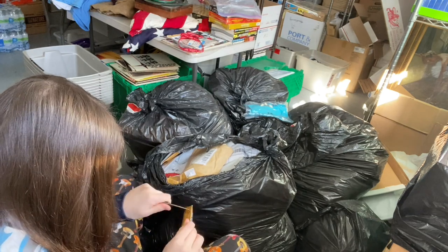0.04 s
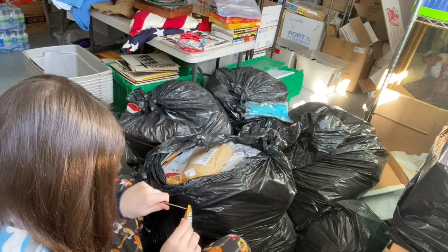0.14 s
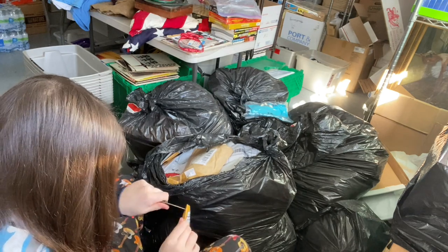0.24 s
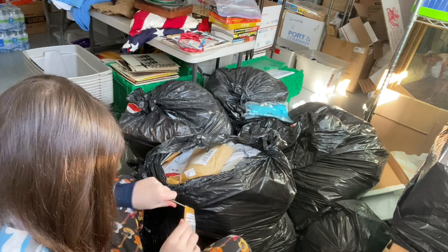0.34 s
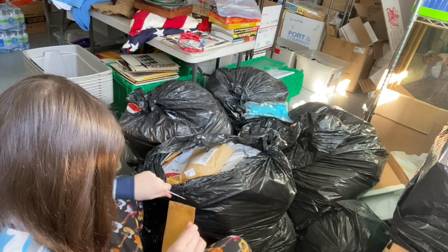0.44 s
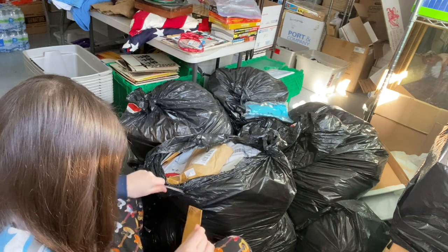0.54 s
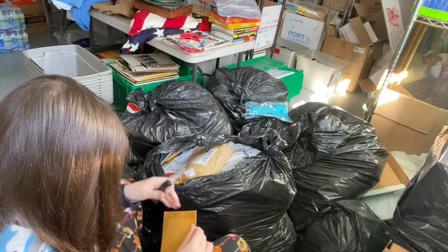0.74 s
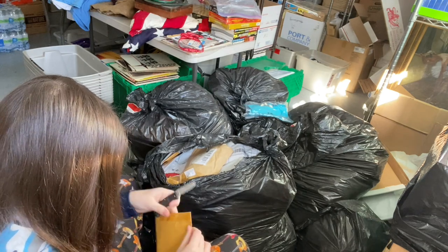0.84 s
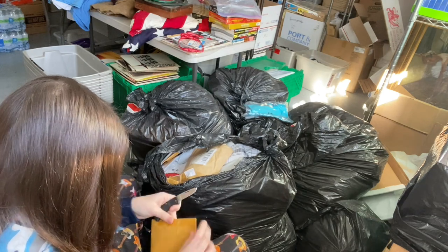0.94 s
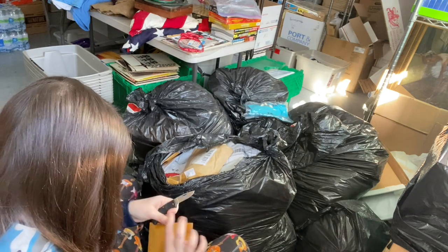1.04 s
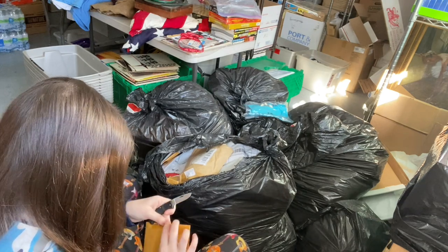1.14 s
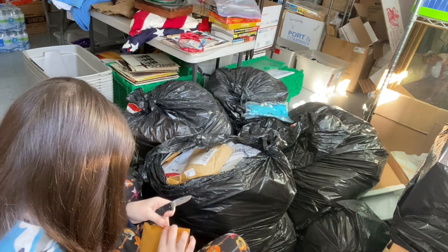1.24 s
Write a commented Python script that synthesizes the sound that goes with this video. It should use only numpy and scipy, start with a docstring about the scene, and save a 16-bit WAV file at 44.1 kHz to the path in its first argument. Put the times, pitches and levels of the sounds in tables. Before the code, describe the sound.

A small knife slits a paper envelope. After a soft thud and faint rustle, the blade pops sharply through the fold at about 0.2 seconds and rips along it in one quick, crackly stroke, ending near 0.35. From 0.75 to 1.3 seconds the envelope is turned, with quieter rustles, crease clicks and dull buckling pops. The room adds a short echo over a faint, low ventilation rumble.

```python
"""In a cluttered storeroom, a small knife pops through the fold of a paper envelope.
It rips along the fold in one quick stroke, snapping a stream of tiny fibres.
The envelope is then turned in the hands: it rustles, its creases tick and its faces buckle.
The room answers with a short, dense echo over a low ventilation rumble."""
import sys
import numpy as np
from scipy import signal
from scipy.fft import rfft, irfft
from scipy.io import wavfile

SR = 44100
rng = np.random.default_rng(int(sys.argv[2]) if len(sys.argv) > 2 else 0)


def generate_wav(signal):
    """Clip the signal to [-1, 1] and save it as 16-bit WAV at the path in sys.argv[1]."""
    frames = np.transpose(np.atleast_2d(signal))
    scaled = np.clip(frames, -1, 1) * 32767
    pcm = np.round(scaled).astype(np.int16)
    wavfile.write(sys.argv[1], SR, pcm)


N = 57330


def undb(db):
    """Turn decibels into a number to multiply by."""
    return 10 ** (np.asarray(db) / 20)


def clock():
    """The time of every sample, in seconds."""
    return np.arange(N) / SR


def unit(x):
    """Scale a sound to an average (rms) level of 1."""
    return x / np.sqrt(np.mean(x ** 2))


def fader(rows):
    """A volume curve through points of time_s, level_db."""
    return undb(np.interp(clock(), *np.array(rows).T))


def die_away(age, fade_s):
    """A volume curve that falls by 60 dB every fade_s seconds."""
    return np.exp(-np.log(1000) * age / fade_s)


def ring(x, response):
    """Make every sample of a sound set off the given response."""
    return signal.fftconvolve(x, response)[:N]


def colour(points, size=8192):
    """A short response of energy 1 whose tone follows points of pitch_hz, level_db."""
    hz, db = np.array(points).T
    grid_hz = np.maximum(np.arange(size // 2 + 1) * SR / size, 1)
    gains = undb(np.interp(np.log(grid_hz), np.log(hz), db))
    # keep the tone, but pack the energy as early as possible
    cepstrum = irfft(np.log(gains))
    cepstrum[1:size // 2] *= 2
    cepstrum[size // 2 + 1:] = 0
    response = irfft(np.exp(rfft(cepstrum)))
    return response / np.linalg.norm(response)


def burst(start_s, decay_s):
    """A puff of dying noise with energy 1."""
    age = clock() - start_s
    noise = rng.standard_normal(N) * (age >= 0) * np.exp(-np.abs(age) / decay_s)
    return noise / np.linalg.norm(noise)


def crackle(snaps_per_s, spread_db):
    """Tiny snaps at random times, mostly weak, a few strong."""
    sizes = undb(spread_db * np.minimum(rng.exponential(size=N), 4))
    happens = rng.random(N) < snaps_per_s / SR
    return unit(happens * sizes * rng.choice([-1, 1], N))


def room(x, direct_db=0, echo_db=0):
    """Left and right get the direct sound, then their own echo: nearby clutter and a tail that dulls."""
    delay_s, split_hz, room_db = 0.004, 6000, -1
    clutter_db, clutter_decay_s = 7, 0.0079
    age = np.maximum(clock()[:SR // 2] - delay_s, 0)
    noise = rng.standard_normal((2, len(age))) * (age > 0)
    low = signal.sosfilt(signal.butter(2, split_hz, fs=SR, output="sos"), noise)
    tail = low * die_away(age, fade_s=0.27) + (noise - low) * die_away(age, fade_s=0.25)
    tail *= 1 + undb(clutter_db) * np.exp(-age / clutter_decay_s)
    echo = np.array([ring(x, side / np.linalg.norm(side)) for side in tail])
    return undb(direct_db) * x + undb(room_db + echo_db) * echo


def ventilation():
    """Ventilation fills the room with rumble, faint hiss and a wavering low hum."""
    # tone of the rumble and hiss: pitch_hz, level_db
    air_tone = [(20, -17.5), (35, -11.5), (52, -3.5), (70, 1.5), (100, -12), (140, -18), (200, -26),
                (400, -36), (1000, -50), (3000, -53.5), (8000, -56.5), (16000, -60.5)]
    # how the hum swells and sinks: time_s, level_db
    hum_levels = [(0, -40.5), (.12, -63.5), (.2, -57.5), (.37, -44.5), (.47, -50.5), (.52, -45),
                  (.72, -61.5), (.83, -45.5), (1.03, -53.5), (1.12, -48), (1.2, -55.5), (1.27, -47.5)]
    air_db, hum_hz, stereo_width, right_louder_db = -56.5, 51, 0.48, 2
    middle, side = (unit(ring(rng.standard_normal(N), colour(air_tone))) for _ in range(2))
    hum = np.sqrt(2) * fader(hum_levels) * np.sin(2 * np.pi * (hum_hz * clock() + rng.random()))
    left_right = np.array([[1], [-1]])
    air = undb(air_db) * (middle + stereo_width * side * left_right)
    return (hum + air) * undb(-right_louder_db * left_right / 2)


def brushing():
    """Fingertips slide lightly over the paper with a thin hiss."""
    # touches of the skin: middle_s, level_db, half_length_s
    touches = [(0.754, -65.5, 0.017), (.985, -71, .03), (1.079, -57, .006), (1.275, -57, 0.049)]
    # tone of the hiss: pitch_hz, level_db
    hiss_tone = [(500, -35), (3000, -29), (6000, 0), (9000, -5), (13000, -5), (16000, -12.5)]
    contact = sum(undb(db) * np.exp(-.5 * ((clock() - at) / half_s) ** 2) for at, db, half_s in touches)
    hiss = ring(rng.standard_normal(N) * contact, colour(hiss_tone))
    return room(hiss, direct_db=-6.5)


def rustling(spots=3):
    """Fingers and blade catch and slip on the paper, making fine crackles at several spots."""
    # strength of the rubbing: time_s, level_db
    rub_levels = [(0, -53.5), (.035, -66.5), (.06, -54), (.095, -62), (.135, -76), (.18, -68), (.45, -80),
                  (.72, -102), (.745, -72.5), (.79, -63), (.808, -49.5), (.83, -67.5), (.86, -59.5),
                  (.915, -72.5), (.945, -56.5), (.99, -73.5), (1.055, -80), (1.08, -50.5), (1.12, -61.5),
                  (1.18, -73.5), (1.208, -53.5), (1.222, -50.5), (1.25, -48.5), (1.27, -56.5), (1.3, -47)]
    # tone of the rustle as heard, with a narrow band near 10.5 kHz cut away: pitch_hz, level_db
    heard_tone = [(100, -13.5), (250, -5), (500, 5.5), (1200, 7), (2300, 4.5), (3500, 0), (8000, -7),
                  (10500, -23), (13000, -9.5), (16000, -31.5)]
    rub, tone, out = fader(rub_levels), colour(heard_tone), 0
    for _ in range(spots):
        slips = crackle(snaps_per_s=2900, spread_db=4.5) * rub
        out += room(ring(slips, tone), direct_db=-5.5)
    return out / np.sqrt(spots)


def thud_and_ticks():
    """A soft low thud at the start, then sharp clicks as paper creases snap and briefly crumble."""
    # the thud, then the clicks: start_s, level_db, treble_tilt_db_per_octave, echo_db
    hits = [(0.015, -35, -18, -7), (0.1969, -39, -1.5, -4), (.2175, -14, 1, -4.5), (0.7987, -33, 0.5, 4),
            (0.9217, -32, 1, -0.5), (1.074, -24.5, 1.5, -0.5), (1.1615, -40, 0, -2), (1.1930, -38.5, 2, -1),
            (1.1978, -38.5, -2, -20), (1.2156, -27, 5.5, 7), (1.287, -25, 5, 0), (1.2935, -24.5, 4, 4)]
    # their shared tone before the tilt: pitch_hz, level_db
    base_tone = [(100, -17), (250, -8.5), (500, -3.5), (1200, 5), (2300, -2), (3500, -2), (8000, -7),
                 (13000, -18), (16000, -10)]
    puff_db, out = -3, 0
    for start_s, level_db, tilt, echo_db in hits:
        hit = undb(puff_db) * burst(start_s, decay_s=.0006)
        hit[int(start_s * SR)] += 1  # one spike leads the puff of noise
        tone = colour([(hz, db + tilt * np.log2(hz)) for hz, db in base_tone])
        out += room(undb(level_db) * ring(hit, tone), echo_db=echo_db)
    return out


def flap(middle_s, level_db, pitch_hz, half_length_cycles):
    """A patch of paper swings briefly at one pitch, swelling and then fading."""
    cycles = (clock() - middle_s) * pitch_hz
    swell = np.exp(-.5 * (cycles / half_length_cycles) ** 2)
    return undb(level_db) * swell * np.sin(2 * np.pi * cycles)


def pops():
    """The blade pops through the fold, the paper buckles, and both make the hollow envelope ring."""
    # swings of the fold giving way, high to low: delay_s, level_db, pitch_hz, half_length_cycles
    fold_swings = [(.0013, -23, 5700, 2), (.0027, -19, 1790, 2), (.0039, -14, 826, 0.63),
                   (.0090, -27, 530, 2.4), (.0095, -35, 283.7, 1.3)]
    # dull pops of buckling paper: middle_s, level_db, pitch_hz
    buckle_pops = [(0.044, -42, 1066), (0.0684, -31, 860), (0.0741, -46, 590), (0.2117, -45, 900),
                   (.3665, -31.5, 695), (0.7564, -46, 3200), (0.7585, -50, 870), (.8445, -51, 630),
                   (0.9233, -46, 1270), (1.0741, -28, 1666), (1.0802, -47.5, 366), (1.2159, -33.5, 1240),
                   (1.243, -37, 1750)]
    # notes of the hollow envelope: pitch_hz, relative_level_db, fade_s
    hollow_notes = [(275.2, -4.5, 0.46), (542.5, 9, 0.079), (723.5, -5, 0.31), (836, -4.5, 0.15),
                    (1024, -11, 0.28), (1183, 2.5, 0.064), (1350, 1, .15), (1745, -2, .15), (1875, -2, .15)]
    pierce_s, hollow_db = .217, -54
    t = clock()
    pierce = sum(flap(pierce_s + delay_s, db, hz, cycles) for delay_s, db, hz, cycles in fold_swings)
    buckles = sum(flap(at, db, hz, half_length_cycles=0.37) for at, db, hz in buckle_pops)
    hollow = sum(undb(db) * die_away(t, fade_s) * np.cos(2 * np.pi * hz * t)
                 for hz, db, fade_s in hollow_notes)
    ringing = undb(hollow_db) * ring(pierce + buckles, hollow)
    return room(pierce, echo_db=-1.5) + room(buckles, echo_db=-1) + ringing


def tearing(spots=4):
    """The blade snaps fibres in a dense stream at several spots of the fold, each with its own echo."""
    # pull of the blade along the fold: time_s, level_db
    pull_levels = [(.195, -73), (.209, -38.5), (.216, -35), (.218, -24.5), (.226, -31), (.240, -33.5),
                   (.256, -28), (.280, -35.5), (.291, -27.5), (.302, -27), (.319, -27.5), (.331, -39.5),
                   (.345, -69.5), (.40, -89)]
    # tone of the tearing as heard, with a narrow band near 10 kHz cut away: pitch_hz, level_db
    heard_tone = [(100, -14), (190, -13.5), (270, -0.5), (420, -2.5), (550, 6.5), (660, -9), (830, 5.5),
                  (1050, -3), (1350, 1), (2000, 0), (2500, -2), (3200, -4), (4200, -5), (6200, -10),
                  (8000, -5.5), (10000, -21.5), (13000, -13), (16000, -33)]
    rasp_hz, rasp_sharpness, rasp_db = 2950, 4.6, -2.5
    rasp_filter = signal.iirpeak(rasp_hz, rasp_sharpness, fs=SR)
    slit = np.interp(clock(), [.26, .30], [0, 1])  # the cut edge rasps more as the slit grows
    pull, tone, out = fader(pull_levels), colour(heard_tone), 0
    for _ in range(spots):
        snaps = ring(crackle(snaps_per_s=800, spread_db=3) * pull, tone)
        rasp = undb(rasp_db) * slit * signal.lfilter(*rasp_filter, snaps)
        out += room(snaps + rasp, direct_db=-6.5)
    return out / np.sqrt(spots)


def scene():
    """The pops, the rip and the handling, over the ventilation."""
    return pops() + tearing() + thud_and_ticks() + rustling() + brushing() + ventilation()


def record(dry):
    """Cut away the very highest treble."""
    top_hz = 14800
    return signal.sosfilt(signal.ellip(8, .2, 70, top_hz, fs=SR, output="sos"), dry)


dry = scene()
out = record(dry)
generate_wav(out)
```